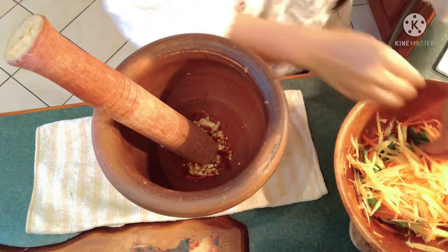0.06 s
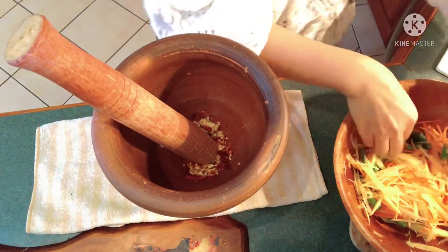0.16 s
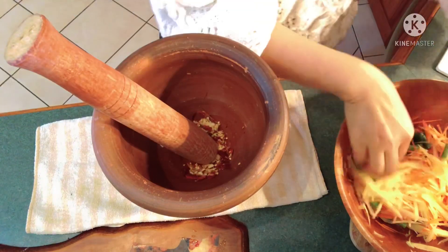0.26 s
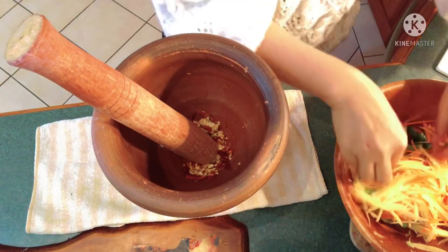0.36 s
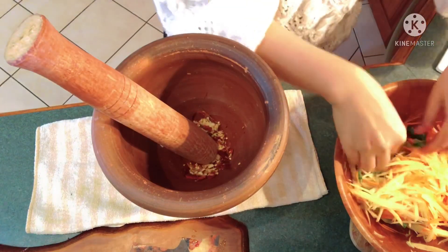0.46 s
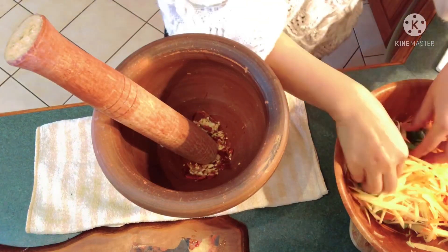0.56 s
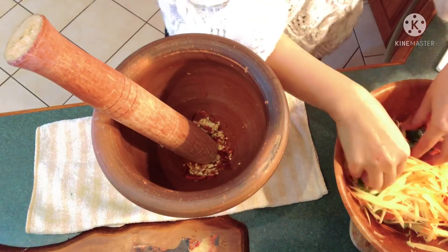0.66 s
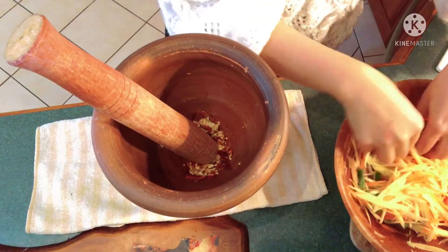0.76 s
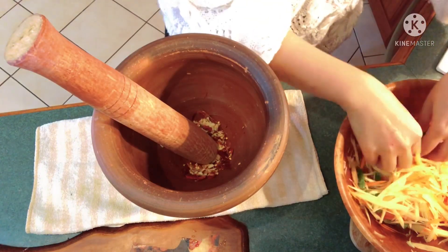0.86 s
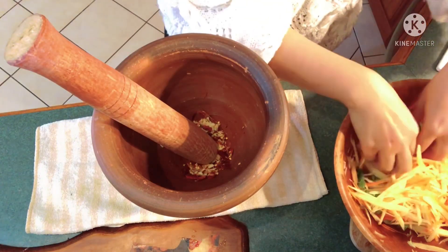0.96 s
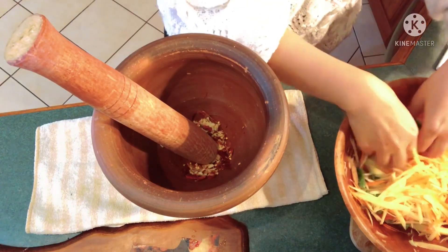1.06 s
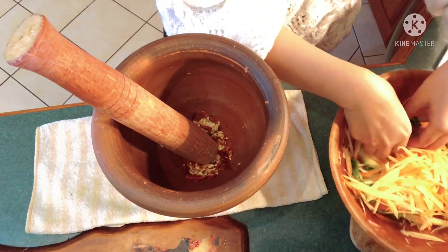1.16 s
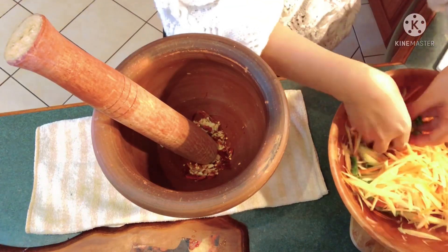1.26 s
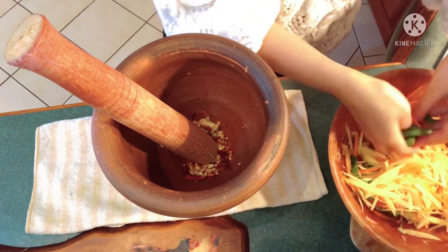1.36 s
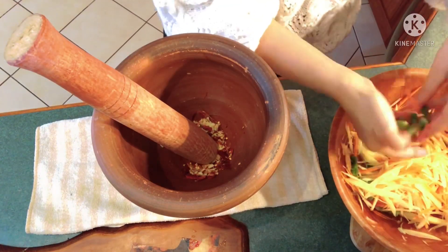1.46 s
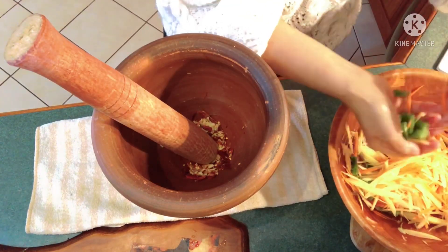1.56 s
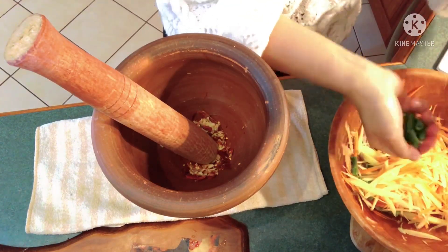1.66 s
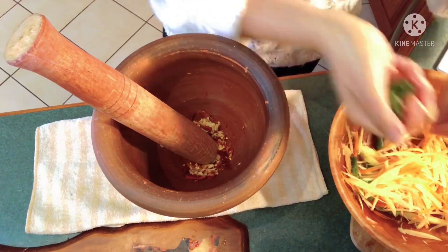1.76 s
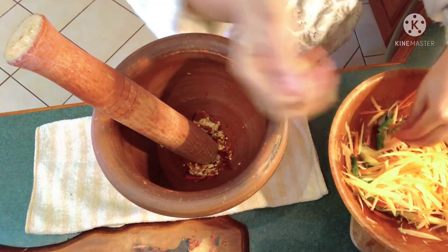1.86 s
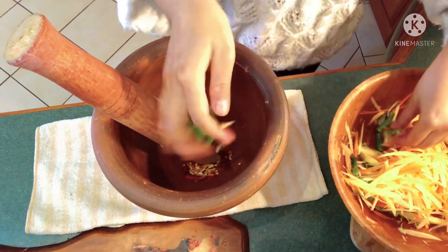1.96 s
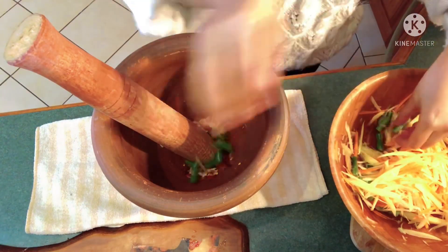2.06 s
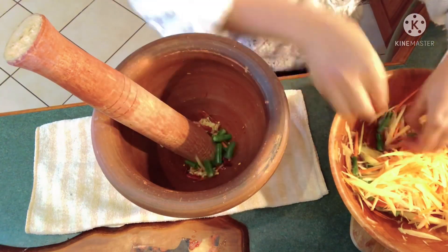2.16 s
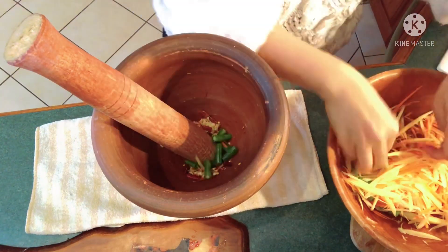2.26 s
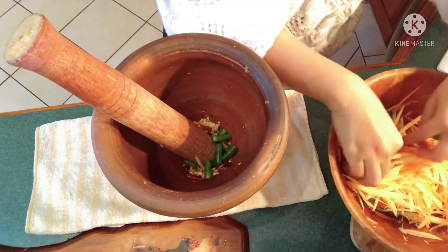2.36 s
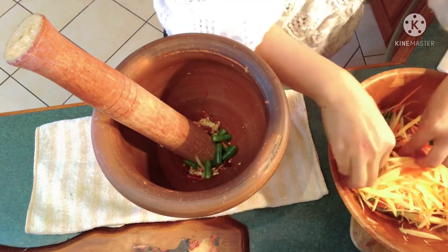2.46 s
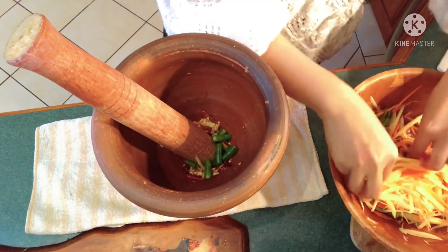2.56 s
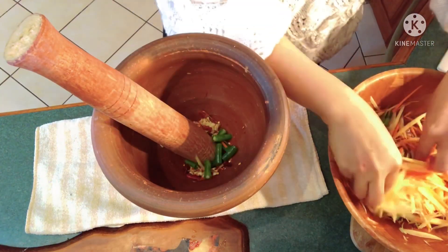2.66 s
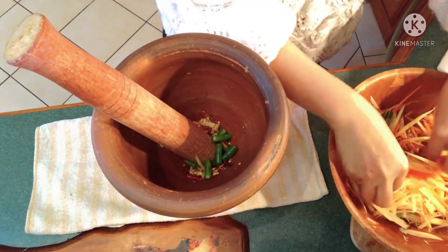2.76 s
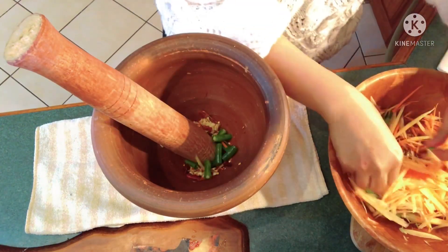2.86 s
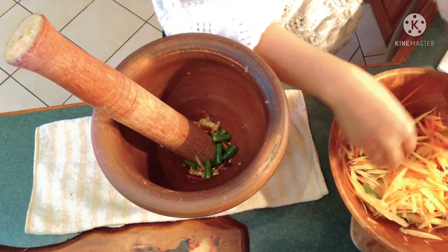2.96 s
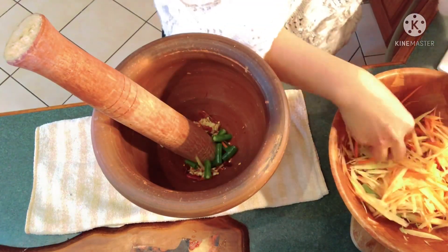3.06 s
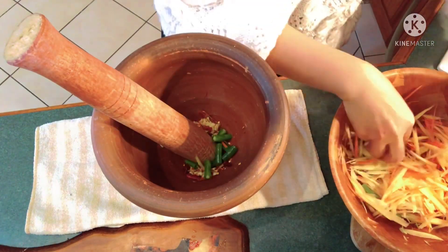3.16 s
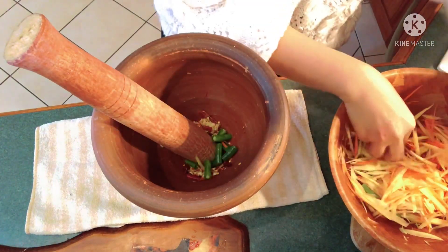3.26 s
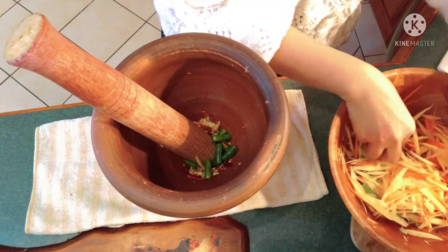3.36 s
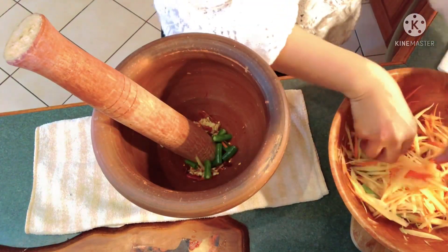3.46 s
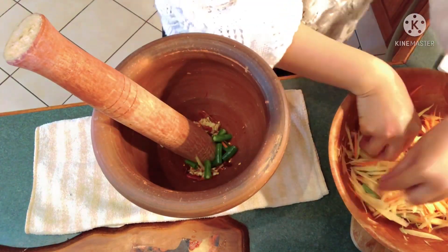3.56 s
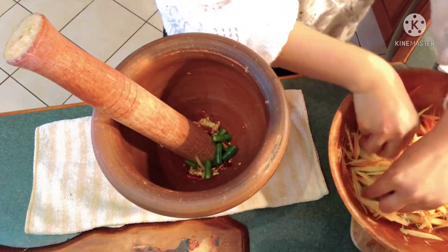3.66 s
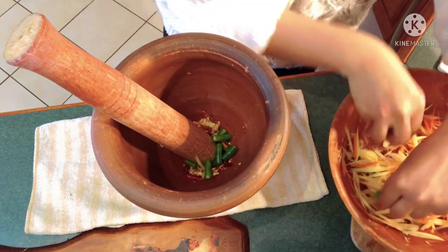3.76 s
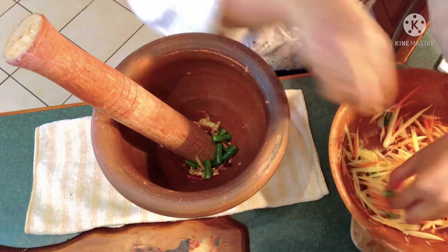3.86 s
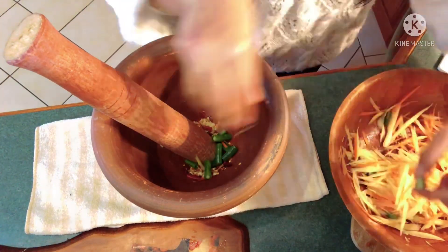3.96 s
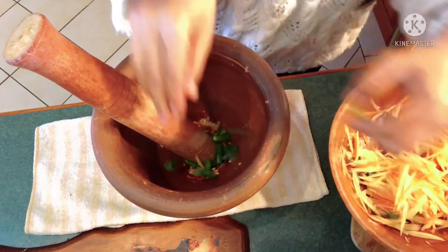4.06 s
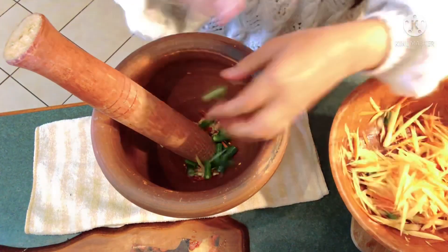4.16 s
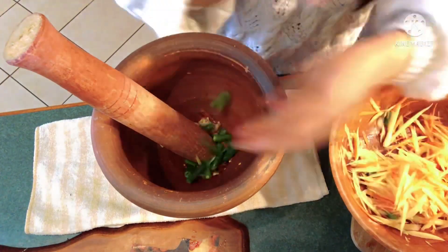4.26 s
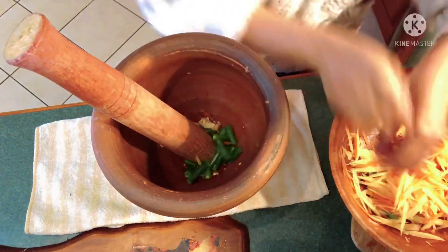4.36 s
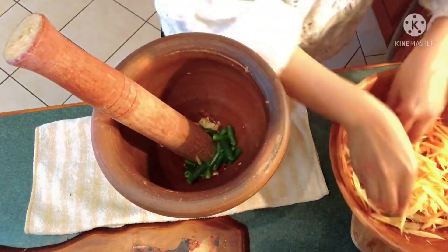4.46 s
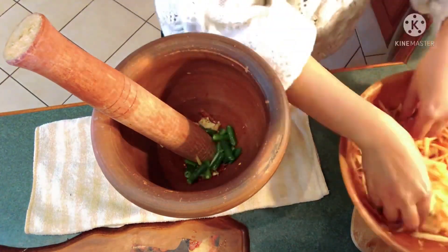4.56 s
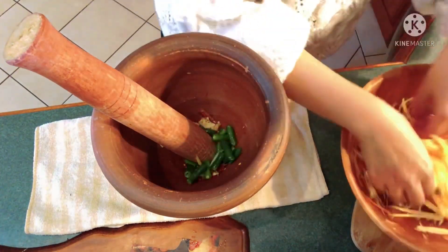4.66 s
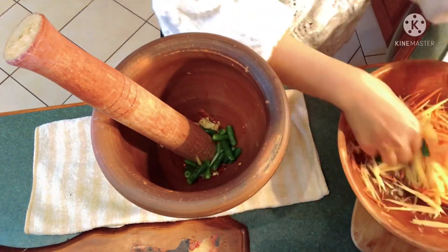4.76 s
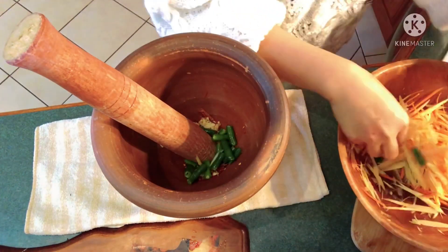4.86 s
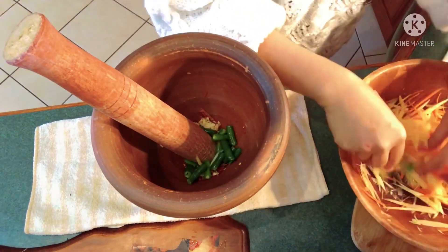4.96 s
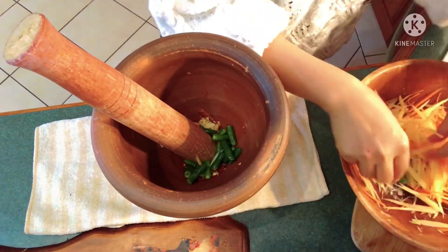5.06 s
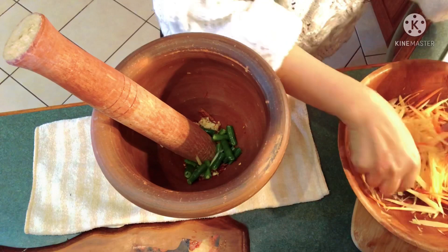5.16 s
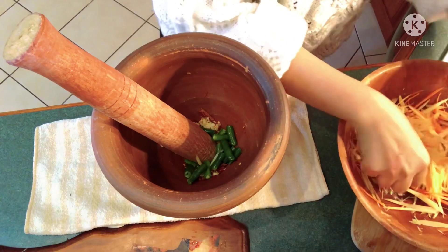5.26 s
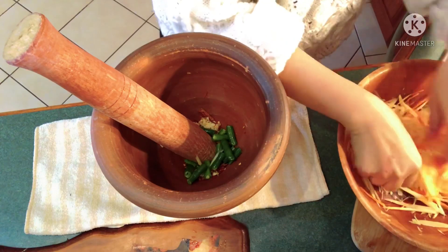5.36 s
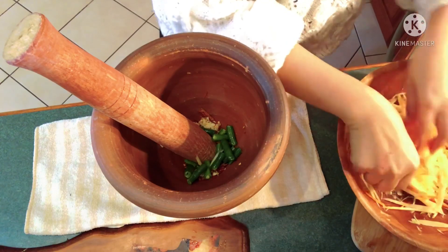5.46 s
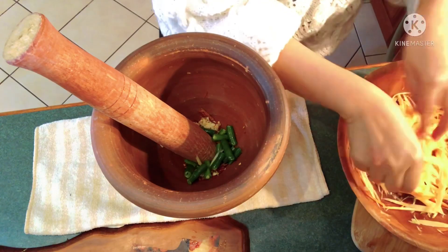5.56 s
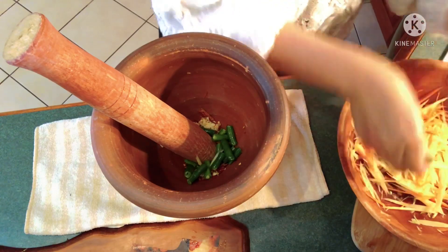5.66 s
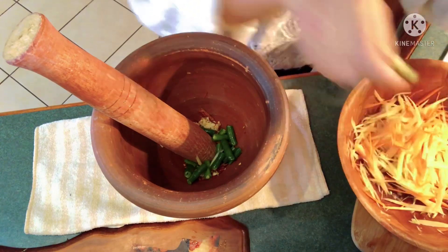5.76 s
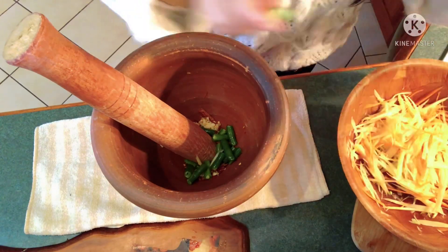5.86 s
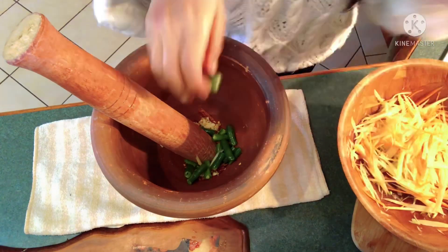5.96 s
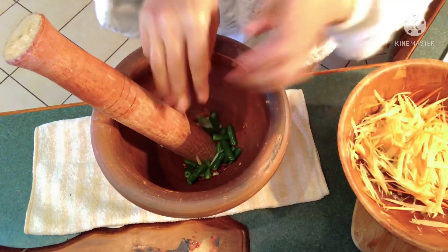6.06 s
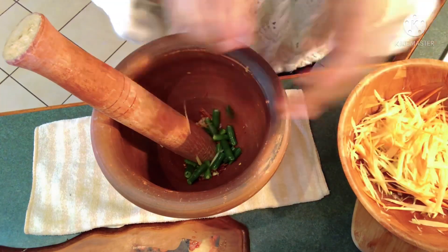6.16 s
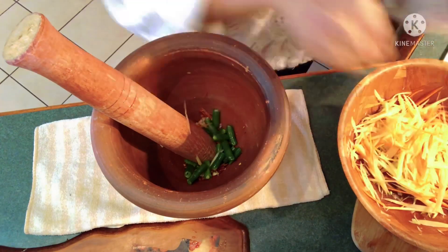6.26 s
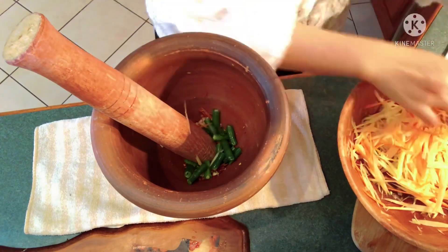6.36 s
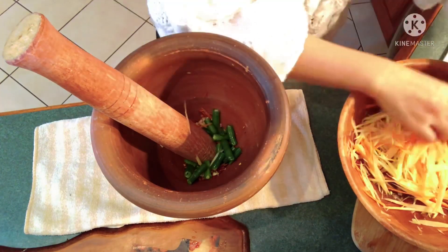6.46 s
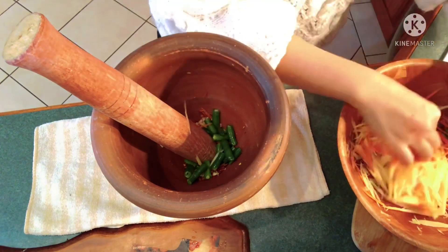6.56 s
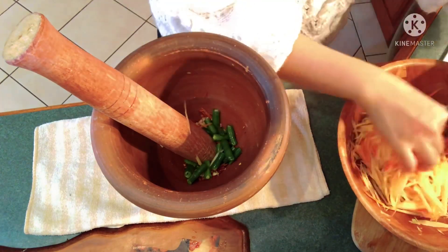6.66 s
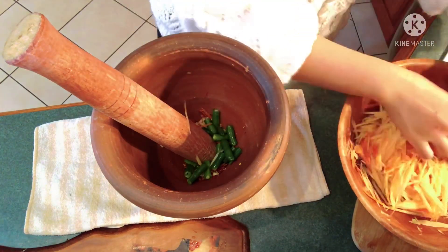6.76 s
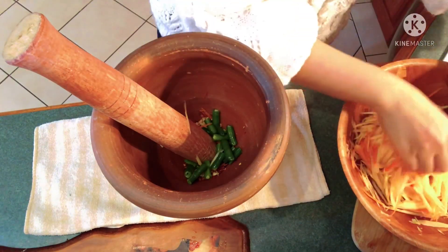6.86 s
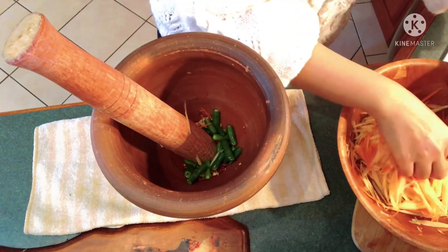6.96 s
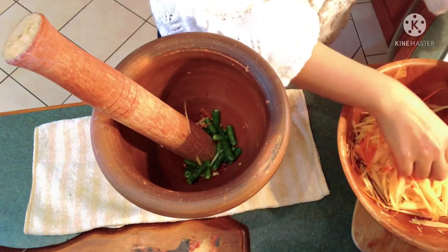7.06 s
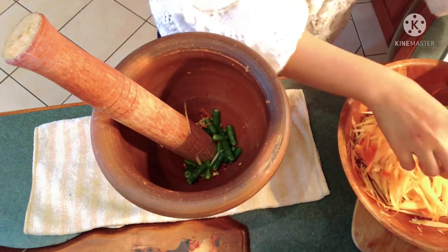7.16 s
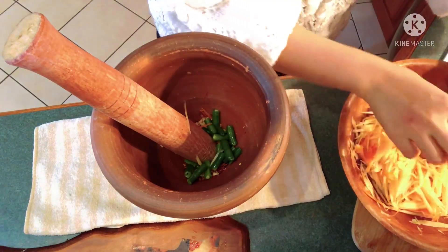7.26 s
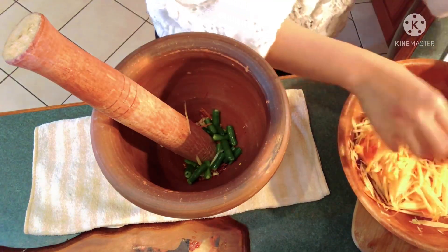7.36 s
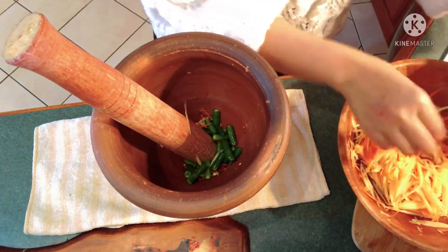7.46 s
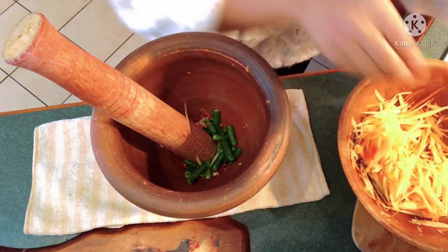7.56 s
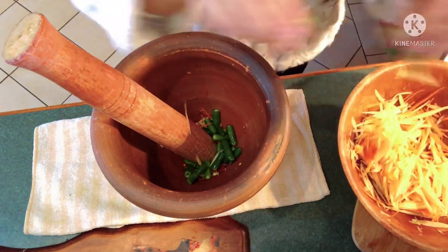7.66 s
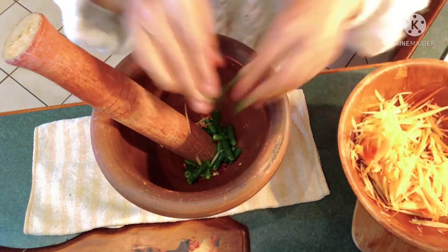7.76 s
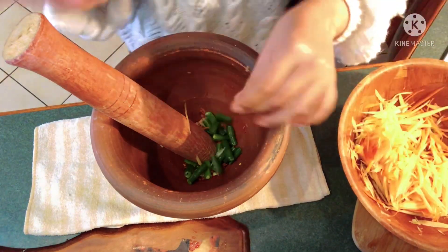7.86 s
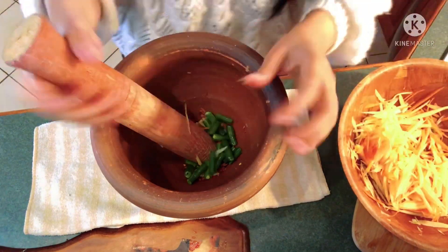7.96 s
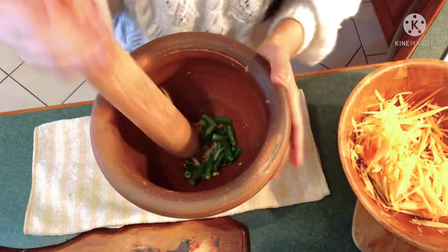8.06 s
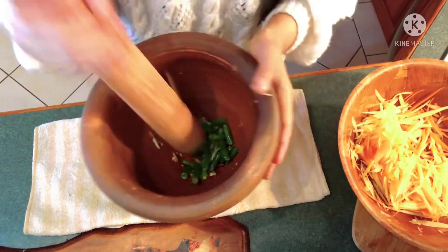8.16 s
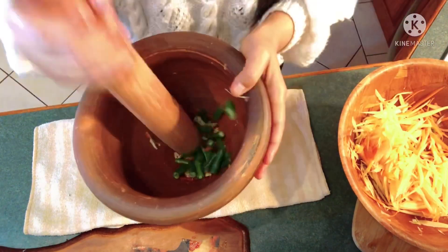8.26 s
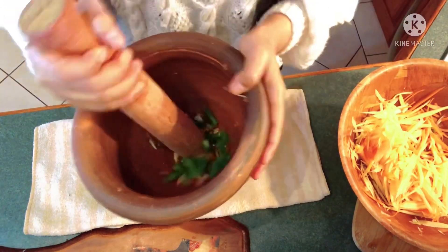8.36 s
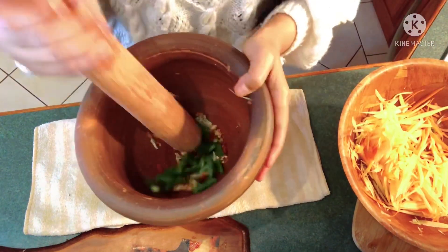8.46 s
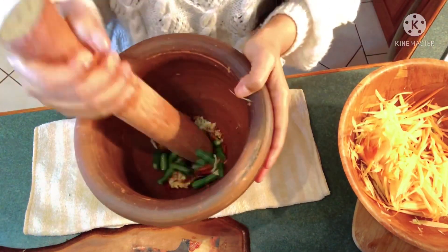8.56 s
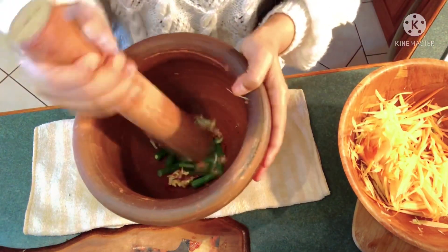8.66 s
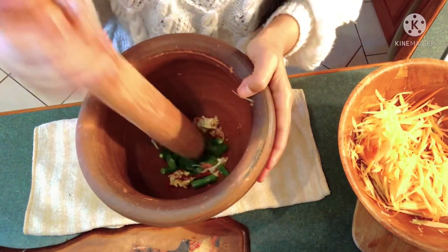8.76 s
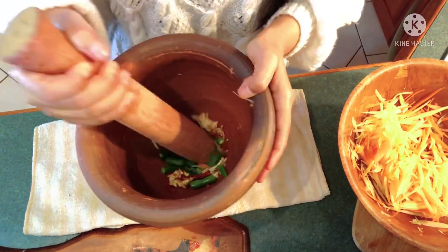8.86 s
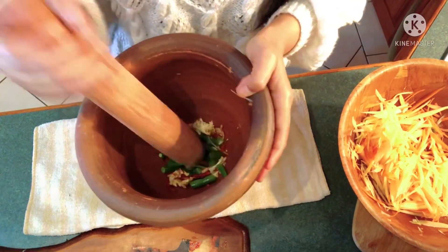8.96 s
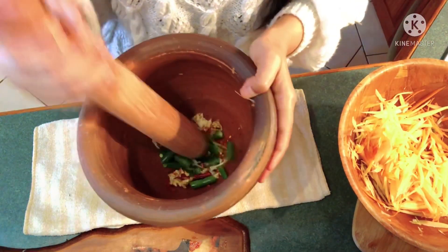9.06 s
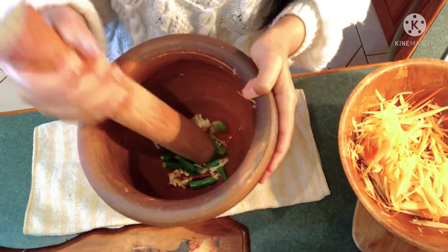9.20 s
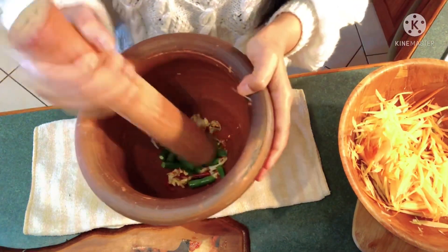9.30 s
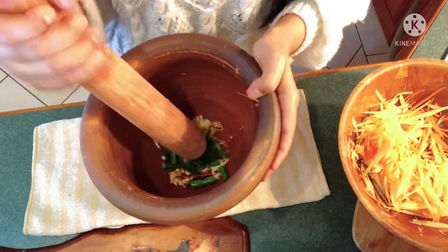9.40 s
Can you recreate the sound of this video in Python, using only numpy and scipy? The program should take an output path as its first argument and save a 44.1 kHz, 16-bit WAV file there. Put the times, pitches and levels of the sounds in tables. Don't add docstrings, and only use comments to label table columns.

```python
import sys
import numpy as np
from scipy import signal
from scipy.fft import rfft, irfft
from scipy.io import wavfile
from scipy.ndimage import uniform_filter1d

SR = 44100
rng = np.random.default_rng(int(sys.argv[2]) if len(sys.argv) > 2 else 0)


def transcribe(signal):
    frames = np.atleast_2d(signal).T
    limited = np.clip(frames, -1, 1)
    pcm = np.round(limited * 32767).astype(np.int16)
    wavfile.write(sys.argv[1], SR, pcm)


def voltage_ratio(decibels):
    exponent = np.asarray(decibels, float) / 20
    return 10 ** exponent


N = 415863


def evened(x):
    return x / np.sqrt(np.mean(x ** 2) + 1e-20)


def peaked(x):
    return x / np.abs(x).max()


def read(points, hz):
    f, value = np.transpose(points)
    return np.interp(np.log(hz + 1), np.log(f + 1), value)


def curve(points):
    return voltage_ratio(np.interp(np.arange(N) / SR, *np.transpose(points)))


def add(mix, start_s, sound):
    part = mix[max(round(start_s * SR), 0):][:len(sound)]
    part += sound[:len(part)]


def coloured(x, points):
    hz = np.fft.rfftfreq(len(x), 1 / SR)
    return irfft(rfft(x) * voltage_ratio(read(points, hz)), len(x))


def causal(points, size=4096):
    level_db = read(points, abs(np.fft.fftfreq(size, 1 / SR)))
    log_gain = np.log(voltage_ratio(np.maximum(level_db, -100)))
    return np.fft.ifft(np.exp(np.conj(signal.hilbert(log_gain)))).real


def around(hz, octaves):
    half = 2 ** (octaves / 2)
    return [(hz / half ** 4, -32), (hz / half, -5), (hz, 0), (hz * half, -5),
            (hz * half ** 4, -30), (hz * half ** 6, -55)]


def through_counter(x, lag_s=.0023, slope=.7):
    khz = np.fft.rfftfreq(len(x), 1 / SR) / 1000
    cycles = 1000 * lag_s * khz ** (1 - slope) / (1 - slope)
    return irfft(rfft(x) * np.exp(-2j * np.pi * cycles), len(x))


def ring(hz, t60, rise_s=0.00023):
    t = np.arange(round(t60 * SR)) / SR
    rise = 1 - np.exp(-t / max(rise_s, 1e-4))
    return voltage_ratio(-60 * t / t60) * rise ** 2 * np.sin(2 * np.pi * hz * t)


def burst(swell_s, fall_s, points, chance):
    t = np.arange(len(chance)) / SR - .02
    envelope = np.exp(np.where(t < 0, t / swell_s, -t / fall_s))
    return peaked(coloured(chance, points) * envelope)


def resonate(x, hz, width_hz):
    turn = np.exp(2j * np.pi * hz * np.arange(len(x)) / SR)
    r = np.exp(-np.pi * width_hz / SR)
    return 2 * (turn * signal.lfilter([1 - r], [1, -r], x / turn)).real


# pitch_hz, level_db per Hz
ROOM_TONE = [(15, -75), (25, -37), (108, -0.5), (131, -7.5), (150, -8), (304, -7.5), (330, -10), (368, -17),
             (483, -12.5), (952, -21), (1430, -23), (6040, -44), (6920, -34.5), (15200, -34), (16500, -71)]
# pitch_hz, width_hz, level_db
FRIDGE_LINES = [(106, 8.5, -72), (159.6, 9.8, -77), (207, 6.2, -80.5), (363.5, 16, -74.5),
                (414.3, 7.1, -80.5), (516.6, 5.8, -85.5)]
# start_s, level_db
MOTOR_FADE = [(0, -80.5), (2.2, -79.5), (2.8, -89), (9.43, -92)]
# start_s, level_db
WHINE_FADE = [(0, -93), (1.5, -92), (3.5, -87), (5, -89), (6.8, -87), (7.6, -89), (8.0, -98), (9.43, -100)]


def air():
    a = rng.standard_normal(N)
    tone = voltage_ratio(-69) * evened(coloured(a, ROOM_TONE))
    fridge = sum(voltage_ratio(db) * evened(resonate(a[::-1], hz, width)) for hz, width, db in FRIDGE_LINES)
    motor = curve(MOTOR_FADE) * evened(resonate(a, 792, 3))
    whine_hz = 6795
    steady = np.sin(2 * np.pi * whine_hz * np.arange(N) / SR)
    fuzzy = evened(resonate(-a, whine_hz, 30))
    return tone + fridge + motor + curve(WHINE_FADE) * evened(steady + fuzzy)


# start_s, level_db
FINGERS = [(0.0, -68.5), (0.34, -78.5), (0.78, -69), (1.13, -65), (1.4, -73), (2.26, -75), (2.75, -63),
           (3.0, -77), (3.39, -68.5), (4.15, -81.5), (4.41, -86), (4.52, -59.5), (4.75, -64), (4.91, -80),
           (6.5, -76), (7.09, -69), (7.3, -72), (7.98, -75)]
# pitch_hz, level_db per Hz
SHRED_TONE = [(1500, -13.5), (3000, -6), (6000, -3.5), (9000, -7.5), (13000, -7.5), (16500, -27)]
# pitch_hz, level_db per Hz
SHUFFLE_TONE = [(150, -29), (300, -1), (450, -5.5), (900, -1.5), (2200, -7), (4000, -21.5), (8000, -50)]


def rustle():
    moves = FINGERS + [(8.14, -66.5), (N / SR, -57.5)]
    start_s, bright_db = np.transpose(moves)
    dull_db = -70.5 + 0.67 * (bright_db + 70.5)
    a, b = rng.standard_normal((2, N))
    slips_per_s, hiss_s = 700, 0.0095
    grains = voltage_ratio(4.0 * np.minimum(rng.exponential(1, N), 5)) * (rng.random(N) < slips_per_s / SR)
    lumps = 4.8 + signal.lfilter([1], [1, -np.exp(-1 / (hiss_s * SR))], grains)
    bright = evened(coloured(a * lumps, SHRED_TONE)) * curve(list(zip(start_s, bright_db - 2.0)))
    dull = evened(coloured(b * lumps, SHUFFLE_TONE)) * curve(list(zip(start_s, dull_db - 1.84)))
    return bright + dull


# start_s, level_db (peak), pitch_hz, click_db, thud_db
HAND_KNOCKS = [(0.803, -56, 1660, -68, -79), (0.902, -54, 1160, -72, -74), (0.976, -48, 1230, -48, -63),
               (1.042, -63, 1280, -62, -71), (1.123, -56, 1140, -64, -72), (1.14, -56, 1150, -62, -77),
               (1.731, -42, 1180, -52.5, -49.5), (2.306, -65, 680, -63.5, -49),
               (2.356, -66, 710, -54.5, -38), (2.391, -51, 1170, -66, -47), (2.649, -60, 1210, -62, -46),
               (3.143, -52, 1110, -80, -53.5), (4.499, -47.5, 1210, -54, -46), (4.507, -58, 1100, -52, -52),
               (4.563, -45, 1100, -39, -37), (7.012, -53, 714, -65, -43.5), (7.393, -66, 820, -81, -48.5)]
# share of its pitch, level_db
BOWL_CLUSTER = [(.8, -7), (1.0, 0), (1.21, -3), (1.5, -10)]
# pitch_hz, level_db per Hz
KNUCKLE_TONE = [(800, -10.5), (2000, -1.5), (5000, -3), (8000, -13), (17000, -35)]
# start_s, level_db, pitch_hz, t60_s, rise_s
BOWL_BUMPS = [(0.00102, -61, 1397, 0.3, 0.0026), (2.071, -48.5, 231, 0.17, 0.017),
              (4.111, -55, 200, 0.16, 0.0083), (7.014, -18, 145.7, 0.13, 0.022),
              (7.392, -35, 185, 0.094, 0.014), (9.031, -45, 1450, .025, .002), (4.564, -38, 520, .04, .001),
              (1.732, -50, 930, .12, .002), (6.43, -41.5, 150, .13, 0.019), (6.66, -40, 145, .13, .02),
              (6.64, -49, 215, .1, .01), (2.5, -46, 150, .13, .02)]


def knocks():
    out = np.zeros(N)
    push = peaked(through_counter(causal(around(310, 1.7)), lag_s=0.00149))
    chance = rng.standard_normal((len(HAND_KNOCKS), 6000))
    for (s, db, hz, click_db, thud_db), a in zip(HAND_KNOCKS, chance):
        t60 = 0.048 * 1000 / hz
        for share, part_db in BOWL_CLUSTER:
            add(out, s + .001, voltage_ratio(db + part_db + 6.0) * ring(hz * share, t60, 0.0006))
        wood = burst(0.0023, t60 / np.log(1000), around(hz, 0.5), a)
        add(out, s - .018, voltage_ratio(db + 0.6) * wood)
        click = burst(0.00019, 0.0026, KNUCKLE_TONE, a[::-1])
        add(out, s - .019, voltage_ratio(click_db + 11.5) * click)
        add(out, s - .003, voltage_ratio(thud_db - 9.5) * push)
        hollow = burst(0.004, 0.022, around(193, 2.28), -a)
        add(out, s - .014, voltage_ratio(thud_db - 0.5) * hollow)
    for s, db, hz, t60, rise_s in BOWL_BUMPS:
        add(out, s, voltage_ratio(db) * ring(hz, t60, rise_s))
    return out


# start_s, length_s, level_db
HAND_BRUSHES = [(0.039, 0.021, -72), (0.164, 0.19, -61), (0.628, 0.04, -66), (0.756, 0.082, -71),
                (1.1, 0.15, -57), (1.356, 0.075, -71.5), (2.324, 0.03, -59), (2.58, 0.029, -66.5),
                (2.61, 0.11, -62), (2.729, 0.12, -71), (2.906, 0.083, -65.5), (3.226, 0.11, -68),
                (3.333, 0.041, -65.5), (4.24, 0.19, -73), (4.372, 0.046, -65), (4.831, 0.12, -63.5),
                (5.337, 0.099, -64), (5.411, 0.078, -66), (6.496, 0.11, -65.5), (6.904, 0.093, -71.5),
                (7.263, 0.031, -63.5), (8.055, 0.12, -64.5), (8.515, 0.069, -57.5)]
# start_s, length_s, level_db, pitch_hz (centre)
DRY_SLIDES = [(0.216, 0.083, -64, 1100), (2.34, 0.054, -65, 3160), (2.347, 0.17, -60, 397),
              (2.627, 0.1, -60, 1600), (4.098, 0.091, -63.5, 240), (4.299, 0.13, -68, 247),
              (4.556, 0.15, -59, 3000), (5.337, 0.13, -65, 1290), (7.005, 0.07, -62, 1000),
              (7.469, 0.2, -68.5, 9350), (8.587, 0.12, -60, 10500), (8.801, 0.051, -63.5, 1500),
              (9.104, 0.22, -58.5, 1440), (0.789, 0.15, -68.5, 1500), (.69, .06, -70.5, 5000),
              (2.06, 0.095, -63, 1800), (8.432, .03, -58, 10000)]
# start_s, length_s, level_db, pitch_hz, width_octaves
SQUEAKS = [(9.24, 0.15, -63, 3950, 0.12), (9.24, 0.11, -61, 5100, 0.2), (9.29, .07, -67, 8050, .1),
           (8.756, .09, -64, 5250, .15), (8.36, .03, -71, 4800, .1), (.636, .1, -74, 2540, .2),
           (.634, .025, -65, 3040, .4), (0.69, 0.014, -70, 5200, .3), (1.15, .06, -68, 3000, .15)]


def swishes():
    out = np.zeros(N)
    t = np.arange(16384) / SR
    rows = []
    for s, length_s, db in HAND_BRUSHES:
        octaves = max(1.4 + 0.14 * (db + 69.5), .4)
        rows.append((s, length_s, db, 5800, octaves))
    rows += [(*row, 1.63) for row in DRY_SLIDES] + SQUEAKS
    chance = rng.standard_normal((len(rows), 2, len(t)))
    for (s, length_s, db, hz, octaves), (a, b) in zip(rows, chance):
        flicker = evened(uniform_filter1d(b, size=50)) + evened(uniform_filter1d(-a * b, size=500))
        patches = list(zip(np.geomspace(300, 16000, 24), 2.5 * b))
        patchy = coloured(a * voltage_ratio(2.2 * flicker), patches)
        softened = coloured(patchy, [(9000, 0.29), (13000, -2.3)])
        u = t / length_s
        swell = np.clip(u / .25, 0, 1) * np.exp(-np.maximum(u - .7, 0) / .15)
        add(out, s, voltage_ratio(db) * evened(coloured(softened, around(hz, octaves))) * swell)
    return out


# start_s, level_db (peak), pitch_hz (centre), length_ms
SHRED_SNAPS = [(0.2314, -43.5, 3200, 2.1), (0.3524, -62, 6900, 1.5), (1.7744, -56, 6000, 1.4),
               (3.1567, -57, 5280, 1.8), (3.6, -58, 6370, 1.8), (3.553, -51, 5500, 2.8),
               (3.8446, -46, 4700, 1.8), (5.3734, -43, 5800, 2.1), (7.219, -43.5, 6200, 0.68),
               (7.8914, -39, 9800, 1.5), (7.9, -46.5, 3150, 5.2), (7.3, -50, 8900, 1.7),
               (8.075, -44, 7100, 1.8), (8.164, -46.5, 6700, 2.8), (8.232, -52, 6800, 1.1),
               (8.3014, -43, 6620, 1.5), (8.3384, -38.5, 5600, 1.5), (8.954, -41, 7700, 1.5),
               (7.927, -42, 11500, 1.2), (7.953, -50, 10500, 1.2), (8.067, -52, 8000, 1.5),
               (3.808, -59, 6500, 2), (3.821, -58, 6800, 1.5), (4.461, -57, 5000, 1.5),
               (2.1, -44, 2400, 2.5), (2.127, -41.5, 5200, 3.5), (2.094, -45, 5600, 1.5),
               (.961, -56, 4400, 2), (4.244, -54, 1500, 2), (4.357, -52, 6200, 1.5), (1.128, -52, 6500, 2),
               (.492, -58, 1100, 3), (6.101, -55, 6800, 3), (2.341, -52, 4800, 2), (2.357, -48, 4200, 2),
               (2.64, -54, 5000, 2), (2.665, -54, 4500, 2), (3.1415, -52, 1500, 1.5), (6.254, -48, 3000, 1)]
# start_s, level_db (peak), pitch_hz (centre), length_ms
SKIN_SPLITS = [(8.258, -37, 3400, 1.3), (8.2617, -23, 4860, 0.58), (8.2672, -22, 2720, 0.84),
               (8.2735, -31, 8000, 0.91), (8.574, -35, 8500, 0.92), (8.578, -46, 2880, 2.1),
               (8.733, -38, 8000, 4.5), (8.7412, -7, 6500, 0.5), (8.8975, -36, 3000, 2.5),
               (9.049, -36, 11000, 1.2), (9.0615, -24.5, 2980, 2.7), (9.063, -21, 6000, 1.2),
               (9.209, -49, 7800, 2.), (9.2175, -22, 2950, 2), (9.2295, -28, 7000, 4.7),
               (9.2345, -24, 7000, 6), (9.3795, -24, 5800, 2), (8.2485, -43, 9000, 1),
               (8.27, -30, 11500, 4.6), (8.358, -50, 11000, 1), (8.4155, -39, 9000, 3),
               (8.4222, -17, 2400, 1.5), (8.4265, -27, 11500, 4), (8.4995, -50, 5200, 1.5),
               (8.566, -45, 6500, 1.5), (8.5875, -24, 10000, 1.5), (8.7485, -15, 8500, .8),
               (8.732, -42.5, 1400, 5), (8.903, -12, 7400, .5), (8.911, -37, 910, 12),
               (9.0595, -14, 6740, .6), (9.2195, -14.5, 6500, .8), (9.373, -31, 9000, 4),
               (9.387, -42, 10000, 3), (8.7417, -16, 10000, .6), (9.2205, -24, 3000, 2)]


def snaps(rows, octaves):
    out = np.zeros(N)
    for (s, db, hz, length_ms), a in zip(rows, rng.standard_normal((len(rows), 2048))):
        crack = burst(0.0003, max(length_ms, .2) / 1000, around(hz, octaves), a)
        add(out, s - .0195, voltage_ratio(db) * crack)
    return out


# pitch_hz, t60_s
WALL = [(845, 0.35), (2112, 0.14), (2920, 0.19)]
WALL_TAIL_DB = [-26, -34, -25.5]


def clay(add_to, s, share, chance, *levels_db):
    for k, ((hz, t60), db) in enumerate(zip(WALL, levels_db)):
        tail = ring(hz * 1.002, 0.433)
        flutter = np.interp(np.linspace(0, 70, len(tail)), np.arange(71), chance[k::3][:71])
        luck = np.tanh(chance[-1 - k::-3][:3])
        short = t60 * np.clip(share, .05, 1) * voltage_ratio(2.0 * luck[0])
        split_hz = WALL[0][0] * .06 * (np.sign(luck[2]) + luck[2])
        add(add_to, s, voltage_ratio(db + 4.0) * ring(hz * 1.083, 0.0069))
        add(add_to, s, voltage_ratio(db + 2.5) * ring(hz * (1.006 + 0.011 * luck[1]), short))
        add(add_to, s, voltage_ratio(db - 4) * ring(hz + split_hz, short))
        add(add_to, s, voltage_ratio(db + WALL_TAIL_DB[k]) * tail * (0.33 + flutter))


# start_s, tick_db (peak),
# ring_db, place round the wall in turns
BEAN_DROPS = [(2.0492, -56, -58, 0.8), (2.0614, -43, -56, 0.87), (2.0667, -30, -43, 0.72),
              (2.0774, -41, -52, 0.3), (2.0858, -29, -59, .01), (2.0934, -28, -51.5, 0.16),
              (2.1036, -18.5, -41, 0.79), (2.1172, -32, -56, 0.78), (2.1222, -24, -55, 0.5),
              (2.1294, -25, -59, .33), (2.1463, -32.5, -49.5, 0.13), (2.1606, -42, -57, .6),
              (2.1664, -40, -62, .35), (2.199, -41, -63, 0.67),
              (4.1014, -41, -54, .52), (4.1101, -27, -37.5, 0.53), (4.1264, -48, -45.5, .15),
                  (4.133, -36, -51, .04), (4.1525, -36, -49.5, .02), (4.1714, -58, -56, .01),
                  (4.1919, -44, -62, .64), (4.2058, -39, -61, 0.51), (4.2313, -35, -60, 0.54),
                  (4.2951, -25.5, -46.5, 0.54), (4.3104, -44, -51.5, 0.21), (4.3364, -45, -51.5, 0.087),
                  (4.3455, -41, -50, 0.85), (4.365, -49, -49, .03), (4.4114, -63, -46.5, 0.52),
                  (4.4608, -50, -68, 0.012),
              (6.0995, -53, -53, 0.51), (6.1235, -29, -53, .02), (6.1334, -54, -47.5, .01),
              (6.1614, -58, -49, 0.63), (6.198, -28.5, -55, .62), (6.2004, -42, -41.5, 0.64),
              (6.254, -32.5, -60, 0.18), (6.305, -44, -64, 0.81), (6.338, -48, -71, 0.61),
              (7.8807, -15, -49.5, 0.19), (7.9254, -43, -57, 0.86), (8.0418, -30, -55, 0.52)]


def beans():
    out = np.zeros(N)
    drops = BEAN_DROPS
    for (s, tick_db, ring_db, place), a in zip(drops, rng.standard_normal((len(drops), 2048))):
        brighter_octaves = np.clip((tick_db - ring_db - 11) / 13, 0, 2.25)
        tick = burst(0.00069, 0.0015, around(3400 * 2 ** brighter_octaves, 1.0), a)
        add(out, s - .019, voltage_ratio(tick_db - 13.0) * tick)
        clack = burst(0.00015, 0.0044, around(1300, 5.1), a[::-1])
        add(out, s - .019, voltage_ratio(ring_db + 1.5) * clack)
        near = np.cos(2 * np.pi * (place - np.arange(len(WALL)) / len(WALL)))
        free_share = .2
        clay(out, s + 0.001074, free_share, a, *(ring_db - 2.5 + 17 * (near - near.max())))
    return out


# pitch_hz, level_db
THUD_TONE = [(24, -44), (40, -24.5), (112, 1.5), (189, .5), (275, -3.5), (366, -15.5), (488, -18),
             (703, -29), (900, -32), (1170, -74), (1980, -100)]
# pitch_hz, level_db, t60_s
BOARDS = [(91.4, -15, 0.24), (116, -8.5, 0.11), (166.6, -2, 0.2), (220.5, -17.5, 0.34), (375, -11.5, 0.087)]


def thud():
    push = np.pad(-peaked(causal(THUD_TONE)), (0, SR // 2))
    for hz, db, t60 in BOARDS:
        add(push, .022, voltage_ratio(db - 11.5) * ring(hz, t60, 0.0024))
    return peaked(through_counter(push))


# start_s, crunch_db (peak), crunch_hz (centre), low_ring_db, high_ring_db of the clay
PESTLE_BLOWS = [(8.2644, -20.5, 4500, -53.5, -31.5), (8.4243, -25.5, 6900, -35, -28.5),
                (8.5847, -17.5, 9650, -55, -59), (8.7484, -19.5, 8100, -51, -33.5),
                (8.9023, -19, 7950, -46, -34.5), (9.0592, -17.5, 6500, -44.5, -34.5),
                (9.2192, -17.5, 6260, -41, -44), (9.376, -26.5, 7450, -56, -35.5)]
# start_s, thud_db, rap_db
BOTTOMINGS = [(8.2715, -29, -46), (8.425, -33, -50), (8.5866, -26.5, -44), (8.752, -28.5, -44),
              (8.9035, -17.5, -29), (9.0639, -22, -32), (9.2209, -17.5, -29), (9.3785, -24, -38)]
# pitch_hz, level_db per Hz
CRUNCH_TONE = [(710, -52), (1200, -17), (1540, -24), (2820, -9), (4100, -14.5), (4880, -5.5), (7490, -1.5),
               (8000, -7.5), (9960, -4), (15100, -4.5), (16500, -26)]
# pitch_hz, level_db, t60_s
WALL_SKID = [(3500, -41, .05), (4250, -44, .05), (5100, -38, .05), (5480, -37, .045), (8050, -38, .045),
             (9600, -40, .045), (11500, -41, .04), (13000, -42, .045)]


def pestle():
    out, boom = np.zeros(N), thud()
    chance = rng.standard_normal((len(PESTLE_BLOWS), 2, 2048))
    bare_ms, padded_ms, held_share = 1.52, 2.35, .12
    for (s, crunch_db, hz, low_db, high_db), (a, b) in zip(PESTLE_BLOWS, chance):
        length_ms = np.clip(bare_ms + 3.5 * (-45.5 - low_db), bare_ms, padded_ms)
        gritty = a * voltage_ratio(4.66 * evened(uniform_filter1d(b, size=14)))
        crush = coloured(gritty, [(1000, -3), (hz / 1.5, -4), (hz, 0), (hz * 1.5, -4)])
        crunch = burst(length_ms / 1050, length_ms / 950, CRUNCH_TONE, crush)
        add(out, s - .019, voltage_ratio(crunch_db + 6.5) * crunch)
        juice = burst(0.002, 0.0056, CRUNCH_TONE, b)
        add(out, s - .017, voltage_ratio(crunch_db - 13.0) * juice)
        clack = burst(0.0021, 0.0044, around(1400, 2.8), b[::-1])
        add(out, s - .0185, voltage_ratio(low_db + 13.0) * clack)
        clay(out, s + 0.001254, held_share, a, low_db + 7.0, high_db - 12.0, high_db - 2.2)
    for hz, db, t60 in WALL_SKID:
        add(out, 9.2342, voltage_ratio(db) * ring(hz, t60))
    rap = peaked(through_counter(causal(around(325, 0.75))))
    for (s, db, rap_db), (a, b) in zip(BOTTOMINGS, chance):
        rattle = burst(0.003, 0.011, around(400, 1.3), b)
        add(out, s - .006, voltage_ratio(rap_db - 9.0) * rattle)
        add(out, s, voltage_ratio(db) * boom)
        add(out, s - .001, -voltage_ratio(rap_db) * rap)
    return out


# pitch_hz, t60_s
ROOM_DECAY = [(200, 0.48), (800, 0.55), (3000, 0.27), (8000, 0.25), (16000, 0.23)]


def kitchen(x):
    taps = np.zeros(SR // 2)
    at = np.arange(200, len(taps) - 20, 20)
    taps[at + rng.integers(0, 20, len(at))] = rng.choice([-1., 1.], len(at))
    hz, t, z = signal.stft(taps, SR, nperseg=256)
    fade = voltage_ratio(-60 * t / read(ROOM_DECAY, hz)[:, None])
    tail = signal.istft(z * fade, SR, nperseg=256)[1]
    return signal.fftconvolve(x, tail / np.linalg.norm(tail))[:N]


def scene():
    pounding = pestle() + snaps(SKIN_SPLITS, 1.4)
    small = beans() + snaps(SHRED_SNAPS, 1.0) + swishes()
    far = coloured(knocks(), [(40, -30), (90, -1)])
    wet = kitchen(voltage_ratio(-17.5) * pounding + voltage_ratio(-13.0) * small + voltage_ratio(-12.5) * far)
    return (pounding + small + far + wet + rustle() + air())[None]


def top_cut(x):
    return signal.sosfilt(signal.butter(12, 16970, fs=SR, output="sos"), x)


def record(dry):
    band = [(20, -12), (55, -4.5), (66, 4.0), (15300, -0.5), (15900, -5), (16900, -31)]
    return top_cut(coloured(dry[0], band)[None])


dry = scene()
out = record(dry)
transcribe(out)
```